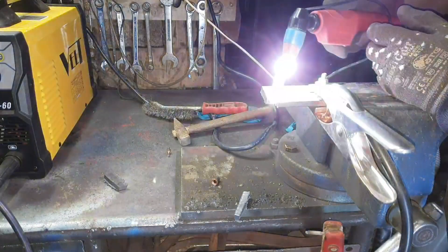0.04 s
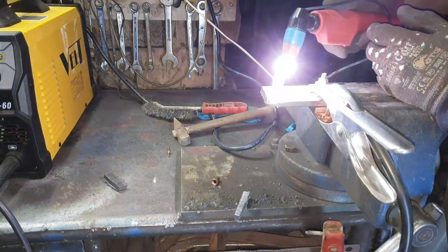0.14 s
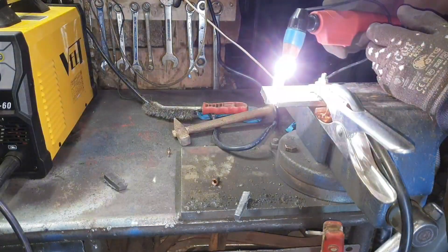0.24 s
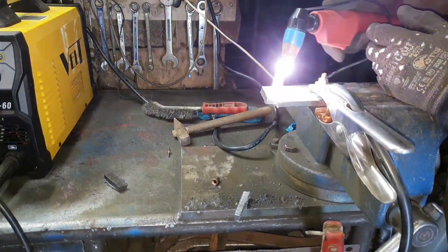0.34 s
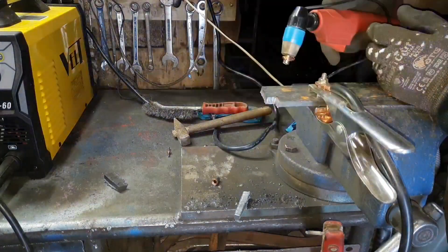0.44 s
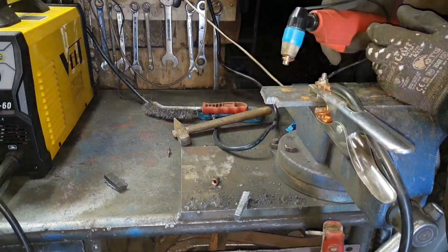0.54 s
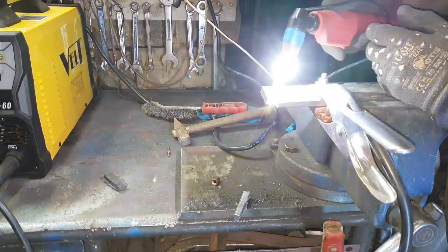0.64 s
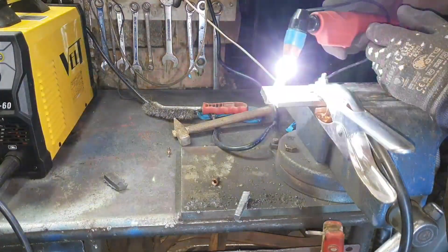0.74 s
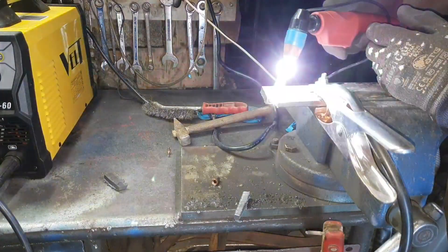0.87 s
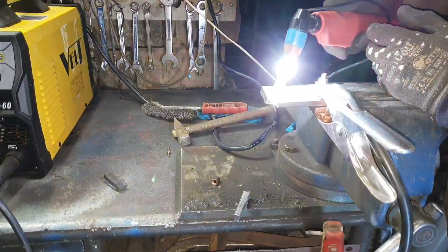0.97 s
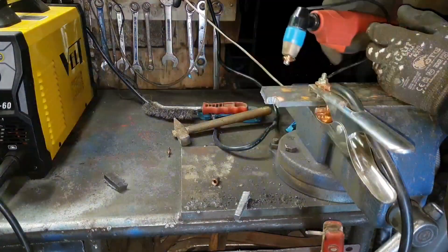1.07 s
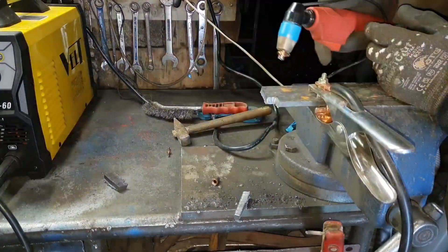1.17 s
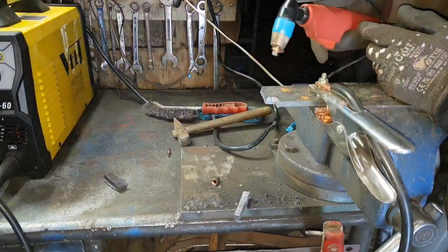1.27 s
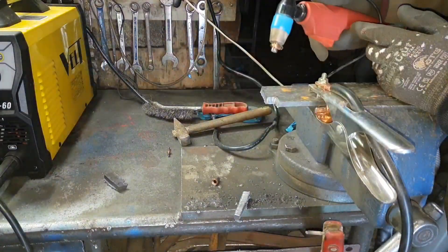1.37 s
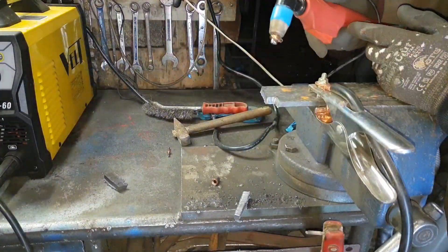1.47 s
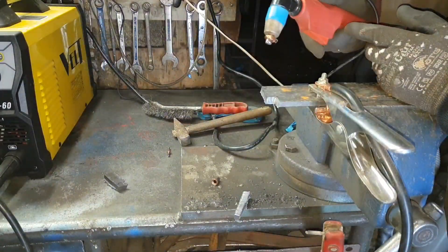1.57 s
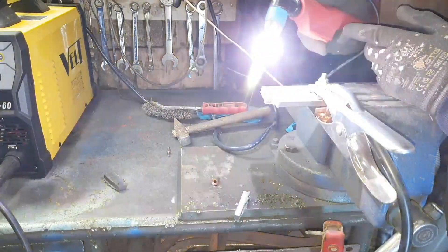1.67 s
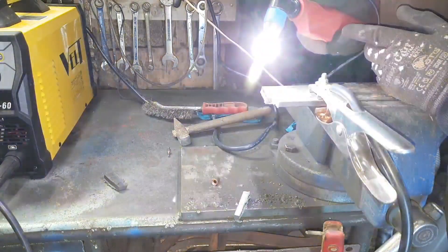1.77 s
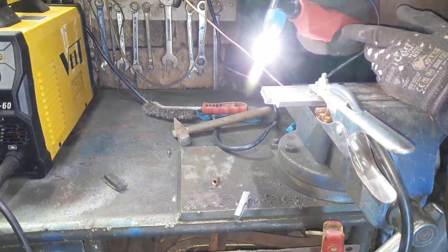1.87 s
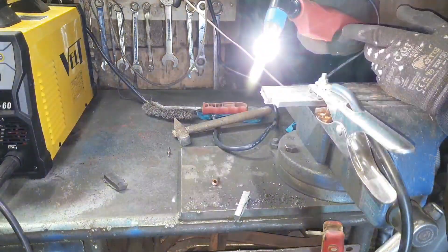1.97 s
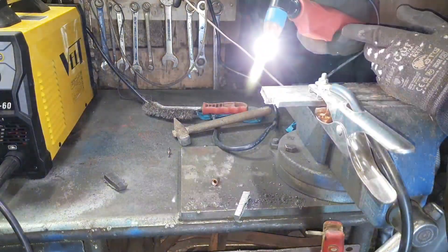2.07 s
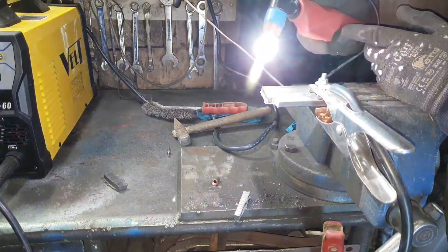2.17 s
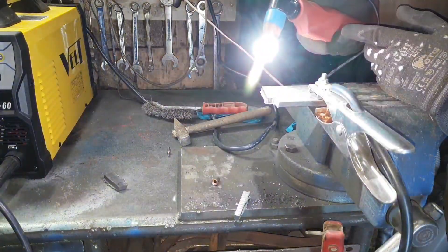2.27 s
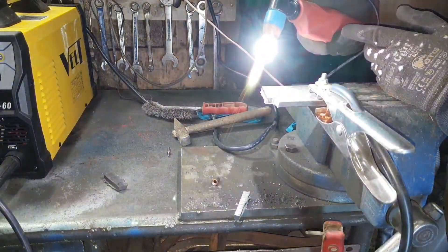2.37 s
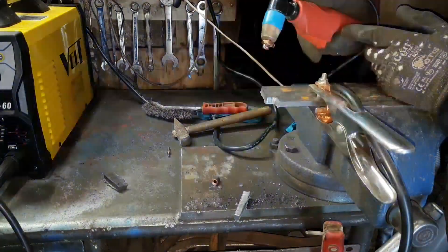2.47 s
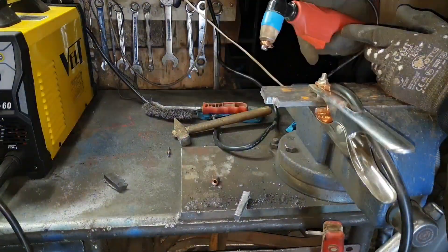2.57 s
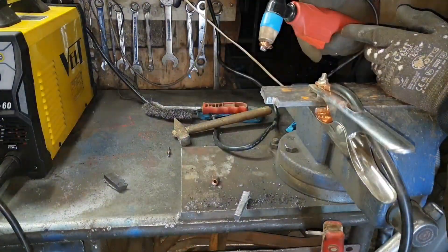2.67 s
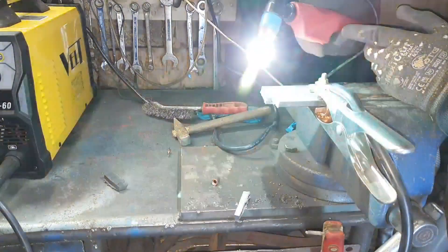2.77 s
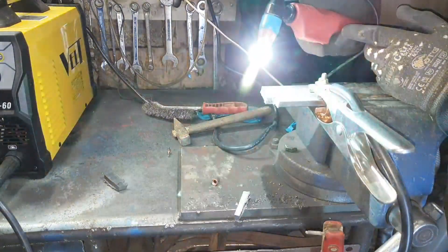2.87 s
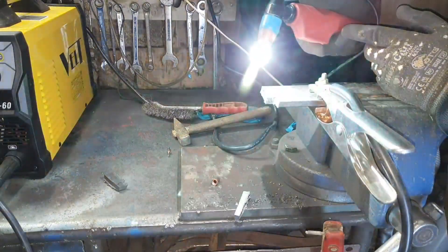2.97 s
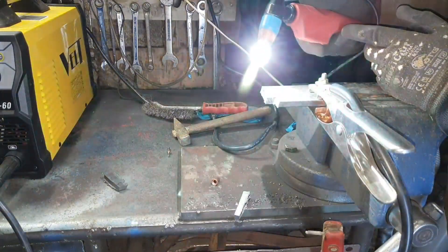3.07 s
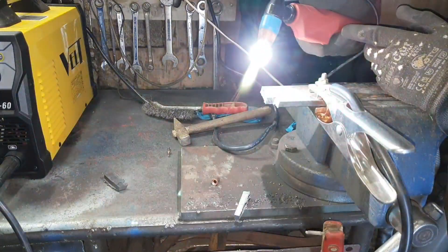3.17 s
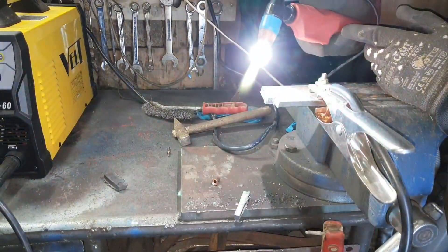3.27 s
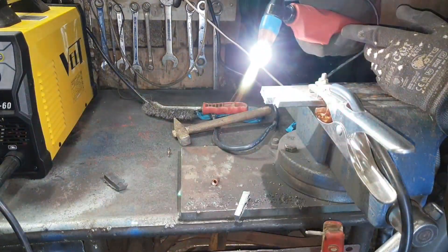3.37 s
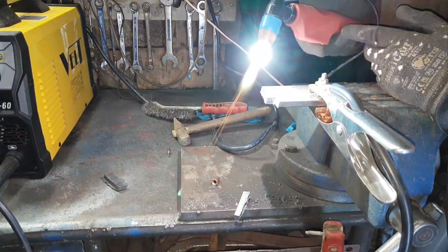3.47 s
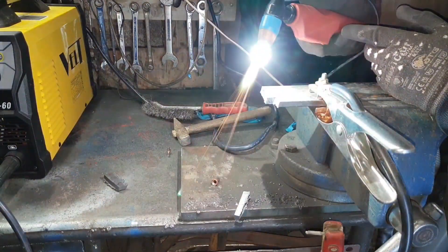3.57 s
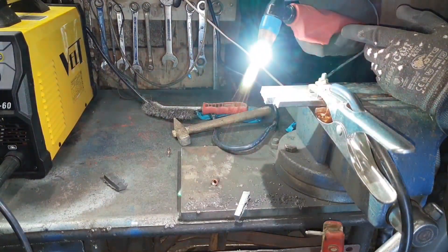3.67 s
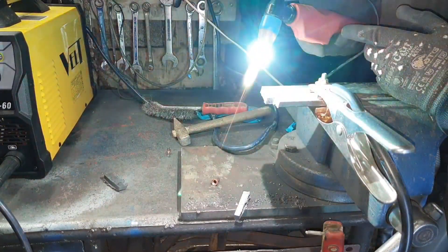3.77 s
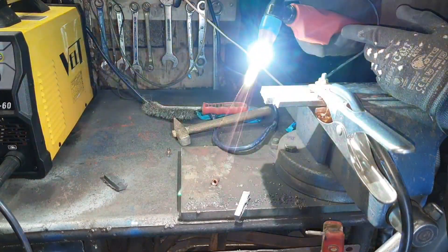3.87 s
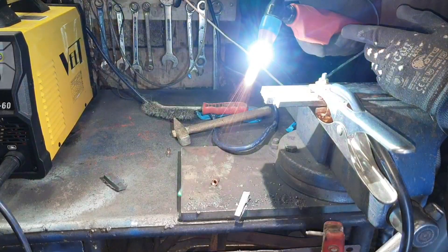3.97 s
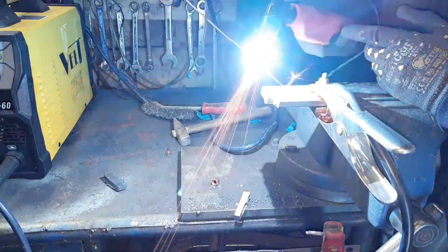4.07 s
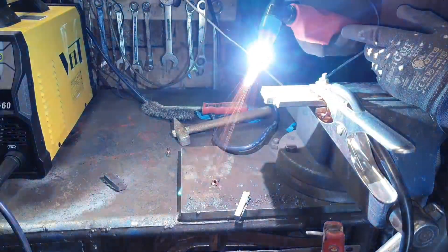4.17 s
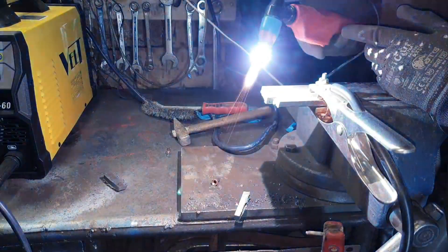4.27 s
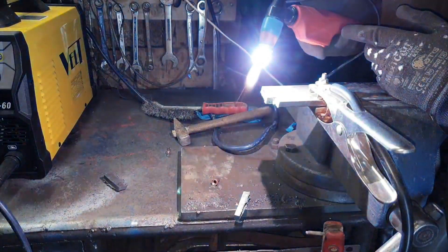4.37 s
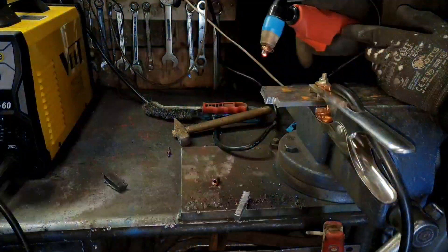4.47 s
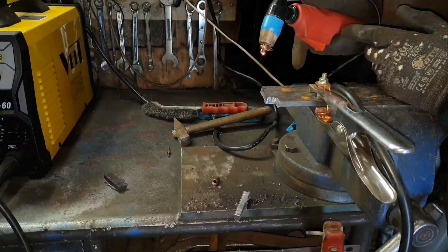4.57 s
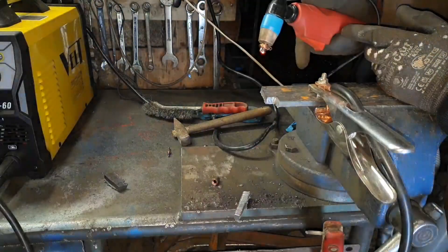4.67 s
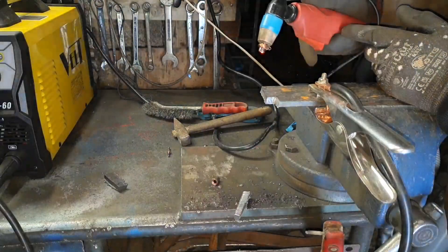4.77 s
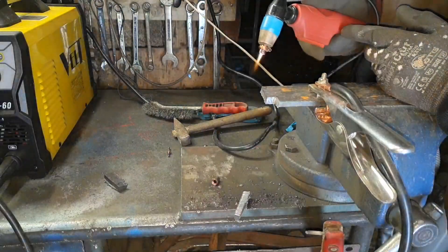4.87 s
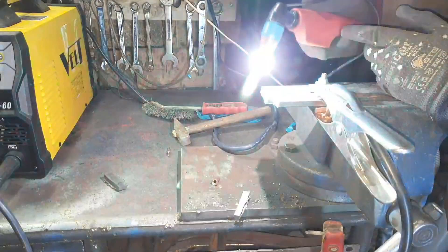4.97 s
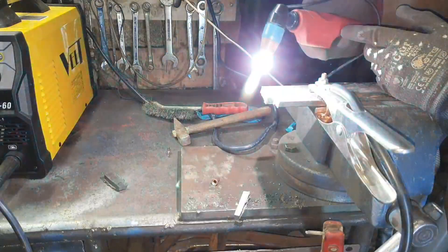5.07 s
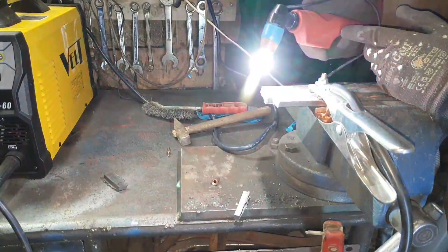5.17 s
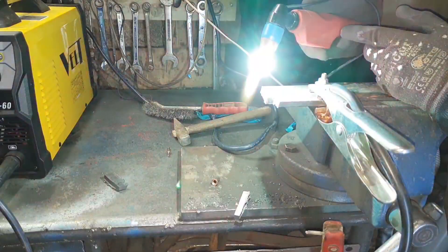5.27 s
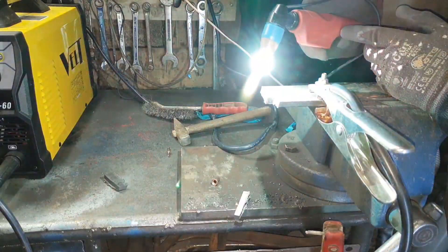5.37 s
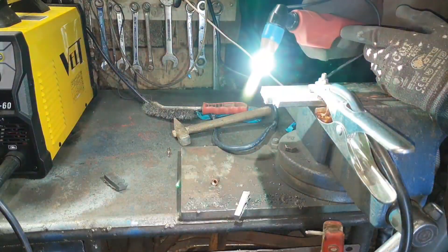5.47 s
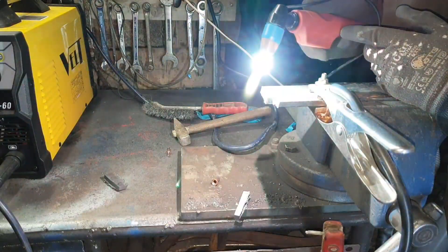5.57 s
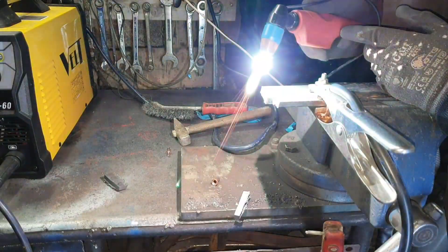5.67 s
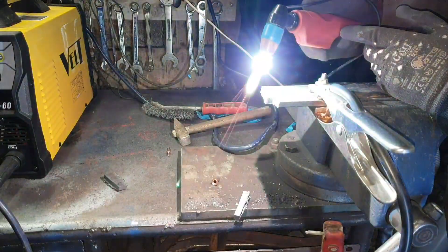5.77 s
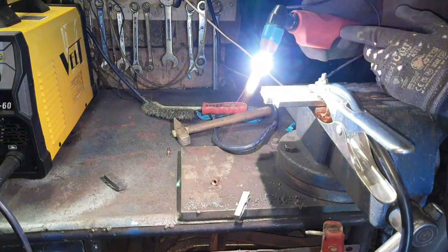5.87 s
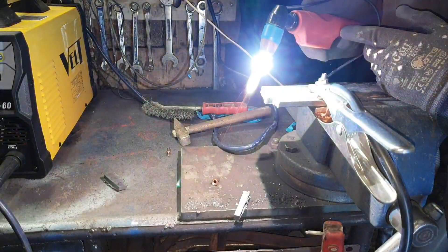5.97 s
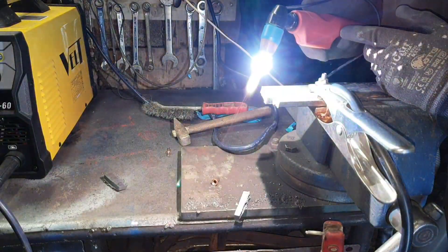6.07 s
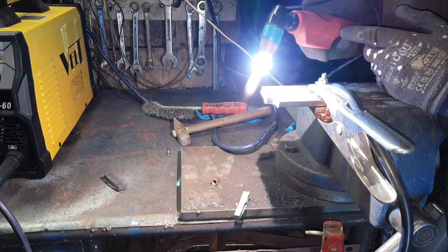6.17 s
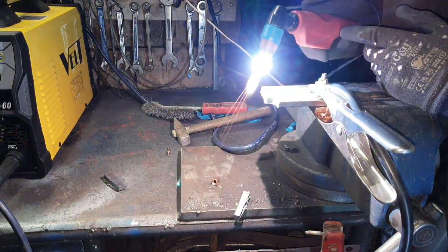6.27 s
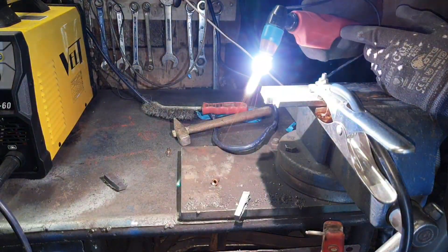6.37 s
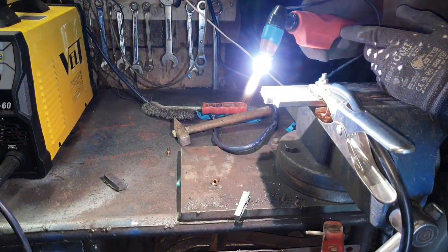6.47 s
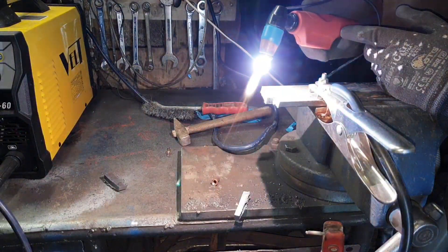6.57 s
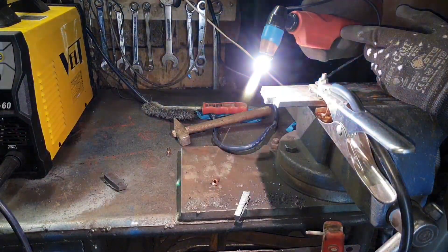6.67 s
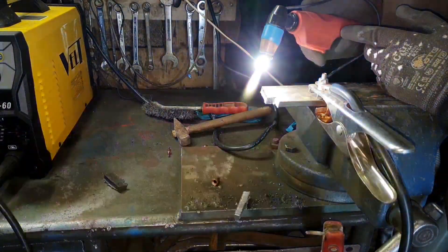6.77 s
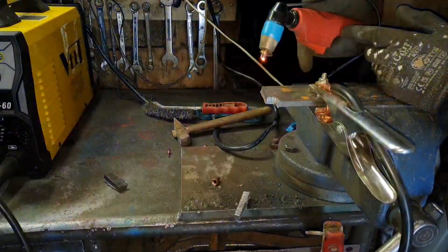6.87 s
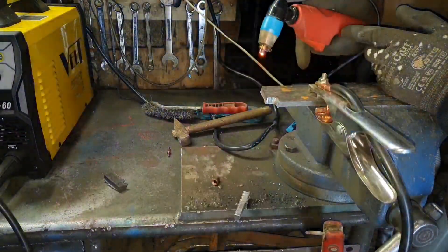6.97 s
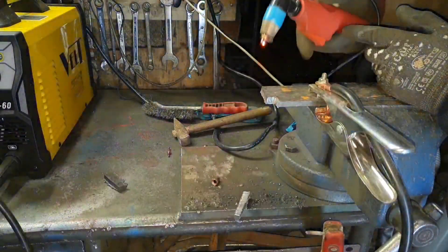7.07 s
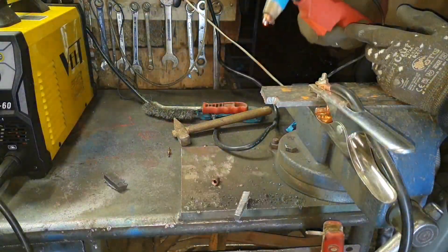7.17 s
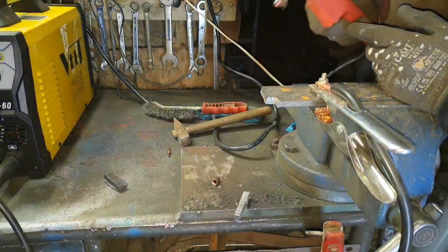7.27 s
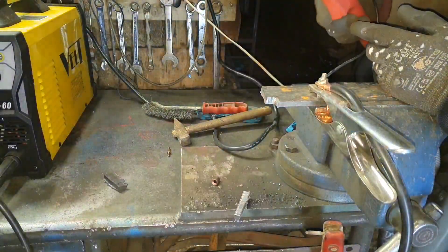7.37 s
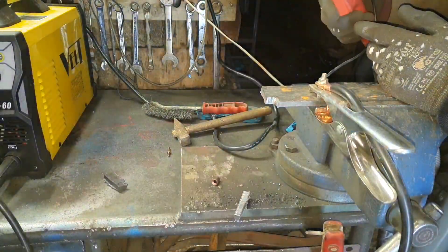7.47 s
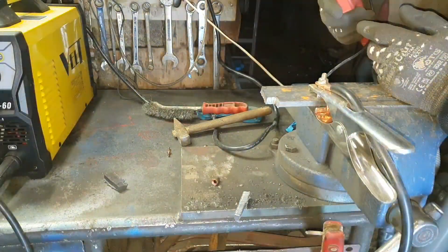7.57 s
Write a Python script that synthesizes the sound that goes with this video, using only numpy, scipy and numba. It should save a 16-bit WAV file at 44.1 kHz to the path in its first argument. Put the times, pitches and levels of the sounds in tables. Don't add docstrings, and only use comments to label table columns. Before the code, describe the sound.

A plasma torch roars and hisses harshly in five bursts, each ending in a sharp pop, with thin air hiss and faint fan whir between.

```python
import sys
import numpy as np
from scipy import signal
from scipy.fft import rfft, irfft, next_fast_len
from scipy.io import wavfile
from scipy.ndimage import uniform_filter1d
from numba import njit

SR = 44100
rng = np.random.default_rng(int(sys.argv[2]) if len(sys.argv) > 2 else 0)


def transcribe(u):
    v = np.clip(np.atleast_2d(u).T, -1, 1)
    q = np.round(v * 32767).astype(np.int16)
    wavfile.write(sys.argv[1], SR, q)


def invert_db(level):
    return 10 ** (np.asarray(level, dtype=float) / 20)


N = 336483
TIME = np.arange(N) / SR
SIZE = next_fast_len(N + SR // 2)
HZ = np.arange(SIZE // 2 + 1) * SR / SIZE


def unit(x):
    return x / np.sqrt(np.mean(x ** 2))


def colour(points):
    hz, db = np.transpose(points)
    return invert_db(np.interp(np.log(HZ + 1), np.log(hz), db))


def above(hz, steep=4.3):
    return 1 / (1 + (hz / (HZ + 1)) ** steep)


def filtered(x, gain):
    return irfft(rfft(x, SIZE) * gain, SIZE)[..., :N]


def shaped(gain, channels=1):
    return unit(filtered(rng.standard_normal((channels, N)), gain))


def scattered(gain, apart):
    mid, side = shaped(gain, channels=2)
    return mid + np.array([[1], [-1]]) * filtered(side, apart)


def walk(rate):
    hold = int(SR / rate)
    levels = np.repeat(rng.standard_normal(N // hold + 1), hold)
    return unit(uniform_filter1d(levels, hold)[:N])


@njit
def svf(x, hz, width):
    y, b, l = np.empty(len(x)), 0., 0.
    for i in range(len(x)):
        g, k = np.tan(np.pi * hz[i] / SR), width[i] / hz[i]
        v = (b + g * (x[i] - l)) / (1 + g * (g + k))
        b, l, y[i] = 2 * v - b, l + 2 * g * v, k * v
    return y


def ring(x, hz, width):
    return svf(x, np.full(len(x), hz), np.full(len(x), width))


def row_at(table, starts):
    row = np.clip(np.searchsorted(starts, TIME) - 1, 0, None)
    return *np.array(table)[row].T, np.clip(TIME - starts[row], 0, 1)


# (arc lit [s], arc out [s])
ARC_TIMES = np.array([(-.1, .4638), (.7425, 1.1734), (1.7848, 2.5371), (2.8535, 4.5328), (5.018, 6.8943)])
LIT_S, OUT_S = np.transpose(ARC_TIMES)


def burning(rise_s, fall_s):
    return sum(np.clip((TIME - on) / rise_s, 0, 1) * np.clip((off - TIME) / fall_s, 0, 1)
               for on, off in ARC_TIMES)


# (frequency [Hz], level [dB])
FAN_COLOUR = [(30, -10), (110, -12), (220, -2.5), (300, 5.5), (425, -2), (520, -1.5), (720, 3), (900, 2),
              (1200, 4.5), (1700, -10), (3000, -13), (5000, -46)]
# (frequency [Hz], level [dB])
MOTOR_LINES = [(205, -15), (296, -31), (425, -11), (513, -18.5), (1233, -15)]
# (rush [dB], blade tone [dB], blade drift [dB/s])
FAN_LEVELS = [
    (-54.5, -62, -8),
    (-58, -61, 9),
    (-59, -63, 6),
    (-59, -57.5, -2),
    (-57, -54, -20),
]


def fan():
    rush_db, blade_db, drift_db, since = row_at(FAN_LEVELS, OUT_S)
    rush = scattered(colour(FAN_COLOUR), np.sqrt(0.097 + 0.66 * above(480, steep=4.1)))
    lines = 0
    for hz, db in MOTOR_LINES:
        level = invert_db(db + 4.7 * walk(15))
        lines = lines + level * np.sin(2 * np.pi * np.cumsum(hz + 2.6 * walk(9)) / SR)
    blade_level = invert_db(blade_db + drift_db * since + 1.5 + 1.5 * walk(15))
    blade_hz = 721 + 1.5 * walk(12)
    blade = blade_level * np.sin(2 * np.pi * np.cumsum(blade_hz) / SR)
    duck = invert_db(-11 * burning(.03, .001))
    return duck * (invert_db(rush_db + 2.5) * (rush + lines) + blade)


# (frequency [Hz], level [dB])
COLD_COLOUR = [(880, -46), (1500, -19), (1830, -18.5), (1980, -18), (2160, -16.5), (2960, -14), (3750, -7),
               (4350, -7), (5240, -7), (6840, -5.5), (8090, -18.5), (9750, -15), (12600, -4), (14900, -5.5),
               (15800, -2)]
# (hiss [dB], hiss drift [dB/s], splash over hiss [dB],
# splash drift [dB/s], fizz [dB])
COLD_AIR = [
    (-39, 1, -2, 3, -40),
    (-42, 4, -11.5, 2, -38),
    (-41, 12, -11.5, -4.5, -38),
    (-40, 5, -8.5, -8, -35.5),
    (-39.5, 7, -10.5, -4, -35.5),
]
VALVE_SAGS = [1.7838, 2.8535, 4.9903]


def cold_air():
    hiss_db, drift_db, splash_db, swell_db, fizz_db, since = row_at(COLD_AIR, OUT_S)
    splash_db = splash_db + swell_db * (since - .15)
    held_db = -6 * np.exp(-since / 0.04)
    hiss_db = hiss_db + drift_db * (since - .2) + held_db
    fizz_db = fizz_db + held_db - hiss_db
    flicker = invert_db(.5 * walk(40))

    low, top = 1 - above(2720, steep=4.6), above(8030, steep=88.0)
    mid = np.clip(1 - low - top, 0, 1)
    cold = colour(COLD_COLOUR)
    edge = 1 + 0.51 / (1 + ((HZ - 2950) / 350) ** 2)
    splash = scattered(cold * edge * np.sqrt(low), 0.47)
    hiss = scattered(cold * np.sqrt(mid), 0.61) * flicker
    fizz = scattered(cold * np.sqrt(top), 0.72) * flicker

    whistle_hz, whistle_width_hz, whistle_db = 3000, 700, 3
    whistle = scattered(1 / (1 + ((HZ - whistle_hz) / whistle_width_hz) ** 2 * 4), .4)
    splash = splash + invert_db(whistle_db) * np.clip(swell_db * since / 2, 0, 1) * whistle

    valve = sum(np.clip((TIME - s + .02) / .012, 0, 1) * (TIME < s) for s in VALVE_SAGS)
    return invert_db(hiss_db - 2.0 * valve) * (invert_db(splash_db + 1.5) * splash + hiss + invert_db(fizz_db + 7.5) * fizz)


# (time [s], hiss [dB], bite of the jet into the steel [0-1])
BURN_CURVES = [
    [(0.0, -24.5, 0.04), (.228, -22, 0.1), (.455, -25, 0)],
    [(.76, -25, 0.08), (.96, -25.5, 0.04), (1.134, -24.5, .06), (1.165, -23, 0.2)],
    [(1.8, -24, 0), (1.902, -23, 0.17), (2.166, -22, 0.34), (2.53, -23.5, 0.06)],
    [(2.86, -25, 0), (2.88, -20.5, 0.4), (2.905, -25.5, 0.22), (3.532, -27, 0), (3.912, -27, 0.3),
     (4.184, -22, 0.36), (4.525, -21, 0.28)],
    [(5.03, -23, 0.14), (5.228, -23, .27), (5.34, -20.5, .5), (5.39, -21.5, 0.38), (5.48, -26.5, 0),
     (5.622, -24, 0.32), (6.098, -23, 0.23), (6.506, -19.5, 0.33), (6.87, -19, 0.3)],
]
# (howl centre [Hz], screech over hiss [dB], screech tilt [dB],
# rasp share of the howl [0-1], strike flare [dB])
TORCH_STANCE = [
    (4240, -8, 12, 0.4, 0),
    (3900, -6, 8, 0.4, 8.5),
    (3870, 0.5, 2, .2, 5),
    (4320, 0, 0.5, 0.47, 5),
    (4040, -2, 2, 0.12, 3),
    (4300, -2.5, 2.5, 0.37, 1),
]
STANCE_FROM_S = np.append(LIT_S, 5.48)


def torch():
    s, burn_hiss_db, burn_bite = np.concatenate(BURN_CURVES).T
    hiss_db, bite = np.interp(TIME, s, burn_hiss_db), np.interp(TIME, s, burn_bite)
    howl_hz, screech_db, tilt_db, rasp, flare_db, since = row_at(TORCH_STANCE, STANCE_FROM_S)
    over_db = hiss_db + 24
    flare_db = flare_db * np.exp(-since / 0.013)
    roar_db = -9 - 0.17 * over_db - 4.5 * bite - flare_db
    screech_db = screech_db + 0.03 * over_db - 2 * bite
    howl_hz = howl_hz + 33 * over_db
    return hiss_db + flare_db, roar_db, howl_hz, screech_db, bite, tilt_db, rasp


# (frequency [Hz], level [dB])
JET_COLOUR = [(18, -73), (30, -46), (279, -18.5), (566, -12.5), (628, -12), (931, -8), (1010, -9),
              (1840, -7.5), (1990, -7), (4150, -3), (7200, -3.5), (8870, -11.5), (12200, 3), (14600, -5),
              (15800, -13.5)]


def jet():
    hiss_db, roar_db, howl_hz, screech_db, howl_share, tilt_db, rasp_share = torch()
    lit = burning(0.0023, 0.0051)
    eddies = invert_db(0.88 * walk(350) + 0.16 * walk(25))
    hot = colour(JET_COLOUR)
    low, top = 1 - above(2824), above(8650, steep=5.8)
    roar = shaped(hot * np.sqrt(low))[0]
    hiss = shaped(hot * np.sqrt(np.clip(1 - low - top, 0, 1)))[0]

    howl_width_hz = np.full(N, 800.)
    howl = svf(rng.standard_normal(N), howl_hz, howl_width_hz)
    howl = unit(svf(howl, howl_hz, 2 * howl_width_hz)) * invert_db(1.9 * walk(56))
    rasp_hz, rasp_width_hz = 5800., 1040
    rasp = ring(rng.standard_normal(N), rasp_hz, rasp_width_hz)
    rasp = unit(ring(rasp, rasp_hz, rasp_width_hz)) * invert_db(2.4 * walk(30))
    howl = np.sqrt(1 - rasp_share) * howl + np.sqrt(rasp_share) * rasp
    howl_share = np.clip(howl_share, 0, .9)
    mid = np.sqrt(1 - howl_share) * hiss + np.sqrt(howl_share) * howl

    thin = above(14700, steep=33.0)
    lower = shaped(hot * np.sqrt(top * (1 - thin)))[0] * invert_db(-3.5 + 0.72 * walk(40))
    upper = shaped(hot * np.sqrt(top * thin))[0] * invert_db(-2.0 + 0.78 * walk(40))
    screech = invert_db(-tilt_db / 2) * lower + invert_db(tilt_db / 2) * upper
    return lit * eddies * invert_db(hiss_db) * (invert_db(roar_db - 0.2) * roar + mid + invert_db(screech_db + 0.95) * screech)


# (time [s], peak [dB], length [ms], rebound [share], shove of air [dB])
ARC_STRIKES = [
    (0.7435, -9, 0.23, 1.8, -12.5),
    (1.7839, 1.6, .15, .3, -22),
    (2.8534, -8.5, 0.16, 3.9, -10.5),
    (4.9903, -5, 0.15, 1.8, -47),
    (5.0171, -6.5, 0.32, 0.37, -38),
]
# (time [s], peak [dB])
ARC_SNUFFS = [
    (0.4636, -5.8),
    (1.17345, -4),
    (2.537, -6),
    (4.533, -3),
    (6.8945, -2.5),
]


def pops():
    rows = [(s, db, 1, ms, rebound, -11, shove_db) for s, db, ms, rebound, shove_db in ARC_STRIKES]
    rows += [(s, db, -1, 0.21, 0.017, -13, 0) for s, db in ARC_SNUFFS]
    out, steps = np.zeros(N), np.arange(-20, 400)
    for s, db, sign, ms, rebound, ring_db, shove_db in rows:
        hiss = rng.standard_normal(len(steps))
        at = int(s * SR)
        t = (at + steps - s * SR) / SR * 1000
        peak = np.clip(1 - abs(t + .04) / (.55 * ms), 0, 1)
        peak = peak - min(rebound, 1.3) * np.clip(1 - abs(t + .04 - ms) / (.6 * ms), 0, 1)
        spit = hiss * (t > 0) * np.exp(-t / 1.14)
        out[at + steps] += invert_db(db) * (sign * peak + invert_db(ring_db) * ring(spit, 3900.0, 2400.0) * 3)
        if sign > 0:
            shove = (t > 0) * np.exp(-t / 2.8) * (1 - steps / len(steps))
            out[at + steps] += invert_db(db + shove_db) * shove
            crack = hiss * (t > -.05) * np.exp(-t / 0.34)
            out[at + steps] += invert_db(db + 5.0) * ring(crack, 11800.0, 2500.)
    port = out + .3 * ring(out, 4100., 1300.)
    port = port - ring(port, 30., 63.0)
    return signal.sosfilt(signal.butter(1, 260., "high", fs=SR, output="sos"), port)


def room_tail():
    t = TIME[:SR // 2]
    bright = above(1300, steep=0.78)
    bass_alike = .5 * (1 - above(1500, steep=1.5))
    parts = []
    for t60_s in (.24, 0.11):
        dense = rng.standard_normal((2, len(t))) * np.clip((t - .0004) / 0.00093, 0, 1)
        decay = invert_db(-60 * t / t60_s) + invert_db(-18.5 - 60 * t / 0.58)
        parts.append(rfft(dense * decay, SIZE))
    low, high = parts
    low = (1 - bass_alike) * low + bass_alike * low[::-1]
    tail = np.sqrt(1 - bright) * low + np.sqrt(bright) * high * invert_db(-2.5 + 3.6 * above(8100))
    return tail / np.sqrt(np.mean(abs(tail) ** 2))


# (lag [ms], left [share], right [share])
HARD_ECHOES = [(.04, 0.23, 0.21), (.08, 0.1, 0.03), (.3, 0.066, -0.011), (1.08, 0.04, 0.031),
               (1.7, 0.11, 0.078), (2.25, 0.018, 0.1), (3.3, -0.025, 0.1), (4.21, 0.31, 0.097),
               (5.5, 0.12, 0.031), (6.5, 0.058, -0.02), (7.35, 0.23, -0.24), (10.5, -0.38, 0.17),
               (11.7, 0.078, -0.35)]
# (frequency [Hz], width [Hz], level
# [dB])
STEEL_MODES = [(954, 40, -1), (1440, 80, -9), (1610, 40, -3), (1825, 70, -7), (2115, 40, -6),
               (2280, 35, -4), (3060, 60, -8), (3322, 40, -8), (3762, 70, -10), (3957, 50, -6),
               (4285, 35, -4), (4459, 50, -8), (4731, 65, -7), (5200, 85, -10), (5448, 45, -6),
               (5900, 70, -10), (6131, 30, -5), (7131, 55, -3), (12500, 500, -10), (15080, 300, -10)]


def workshop(x):
    lag_ms, *shares = np.transpose(HARD_ECHOES)
    steel = sum(invert_db(db) / (1 + 2j * (HZ - hz) / width) for hz, width, db in STEEL_MODES)
    x = filtered(x, 1 + steel)
    early = x * invert_db(np.array([[0], [-1.58]]))
    place = 1.315 * np.cumsum(abs(walk(2))) / SR
    late = 0
    for weight, stretch in ((np.cos(np.pi * place), .99), (np.sin(np.pi * place), 1.01)):
        turns = np.exp(-2j * np.pi * np.outer(stretch * lag_ms / 1000, HZ))
        early = early + filtered(weight ** 2 * x, np.array(shares) @ turns)
        late = late + filtered(weight * x, room_tail())
    return early + invert_db(-4 + np.array([[.4], [-.4]])) * late


def scene():
    background = (cold_air() + fan()) * invert_db(np.array([[.5], [-.5]]))
    torch_in_room = workshop(invert_db(-0.5) * jet() + pops())
    return background + invert_db(np.array([[.25], [-.25]])) * torch_in_room


def low_pass(x):
    return signal.sosfilt(signal.butter(12, 16300, fs=SR, output="sos"), x)


def record(dry):
    rounded = np.tanh(.7 * dry) / .7
    top_cut = signal.ellip(10, .3, 60, 15620, fs=SR, output="sos")
    return low_pass(signal.sosfilt(top_cut, rounded))


dry = scene()
out = record(dry)
transcribe(out)
```